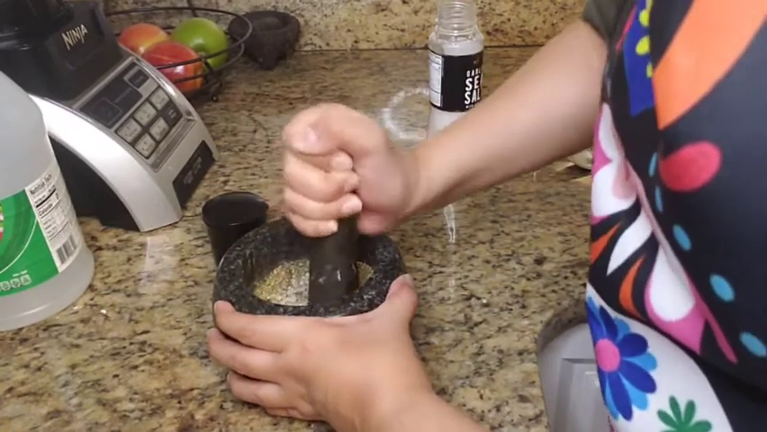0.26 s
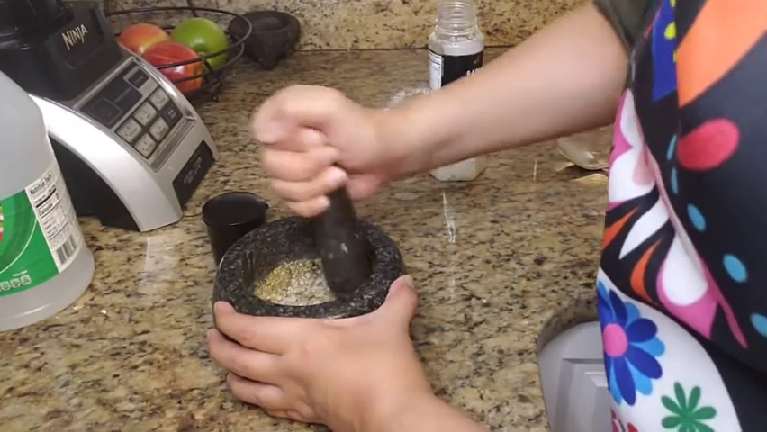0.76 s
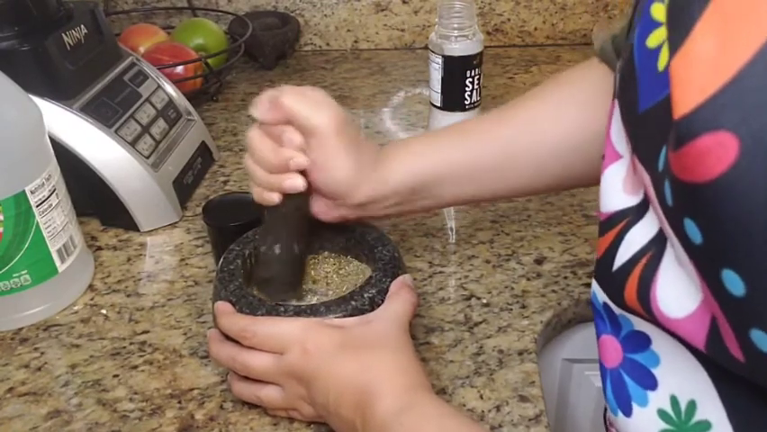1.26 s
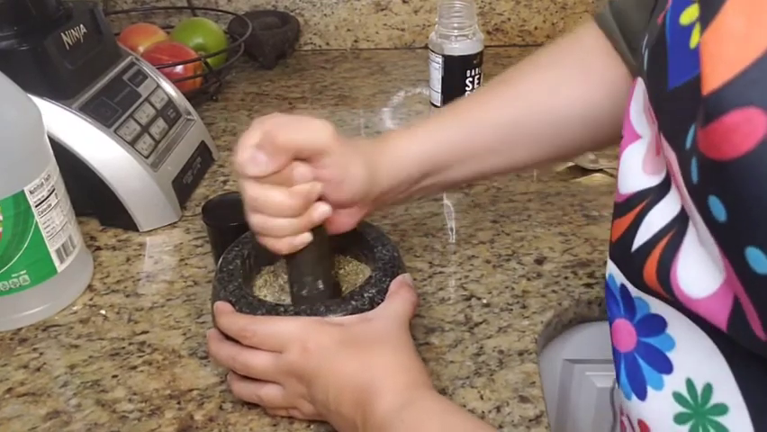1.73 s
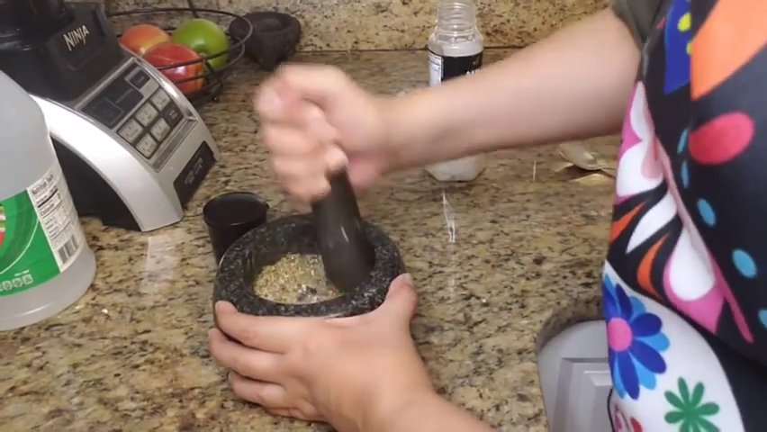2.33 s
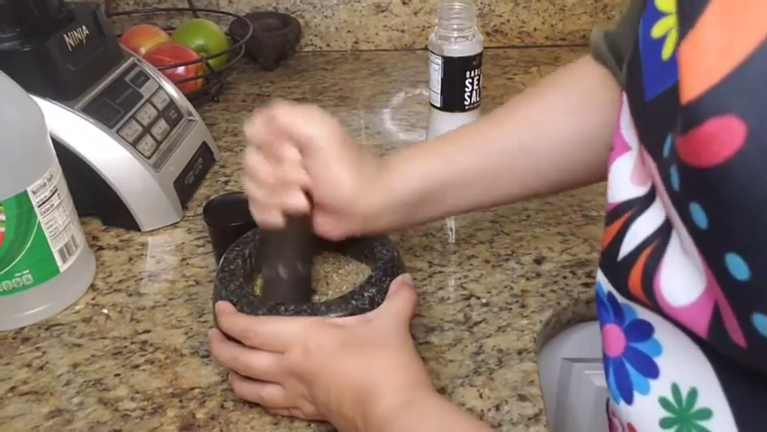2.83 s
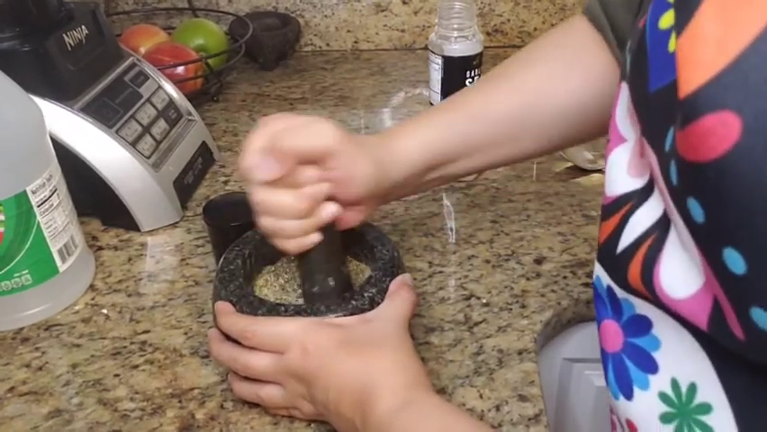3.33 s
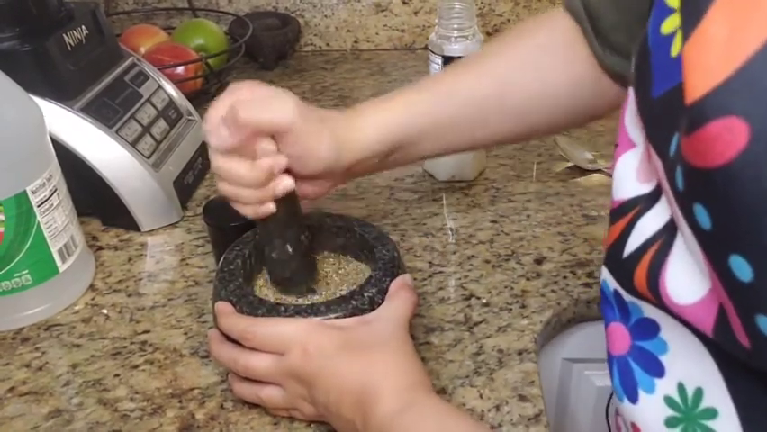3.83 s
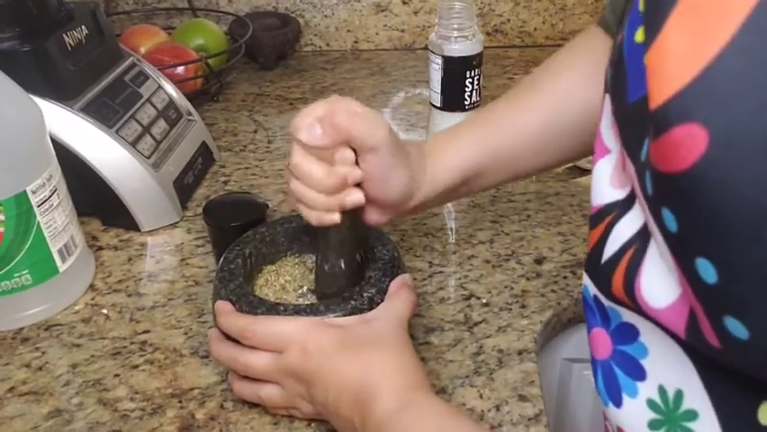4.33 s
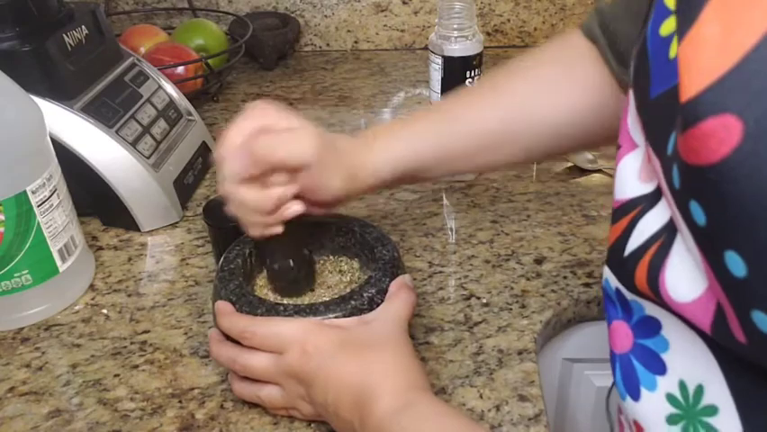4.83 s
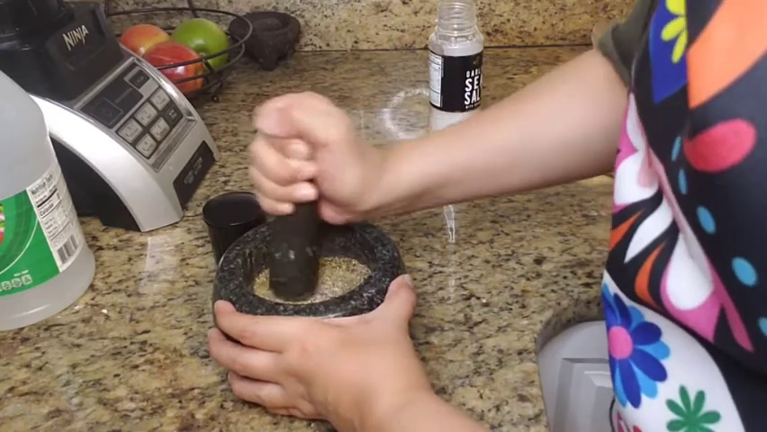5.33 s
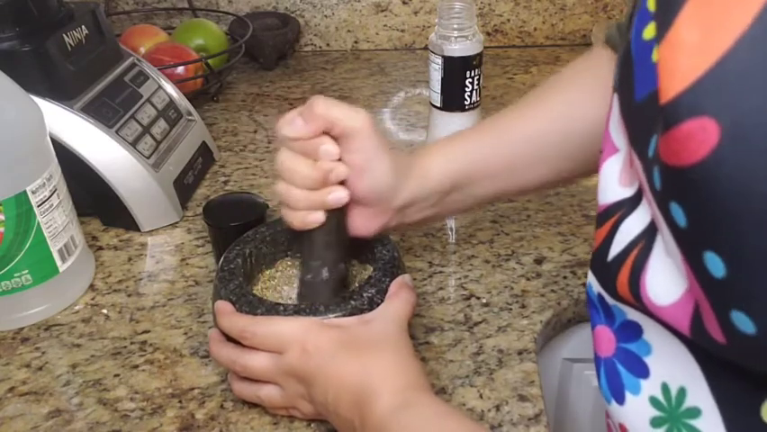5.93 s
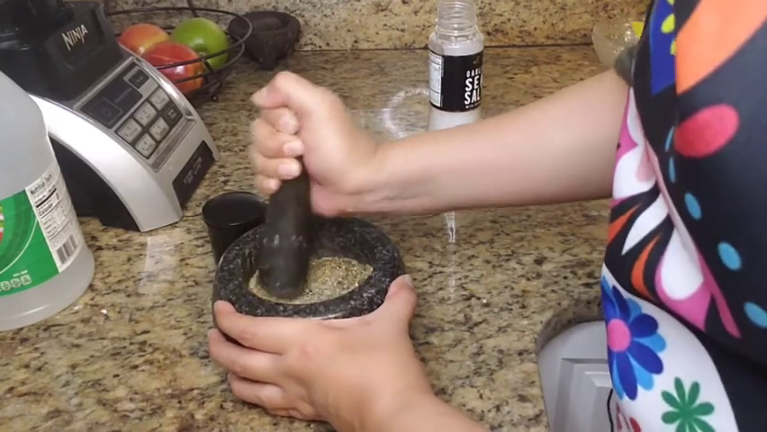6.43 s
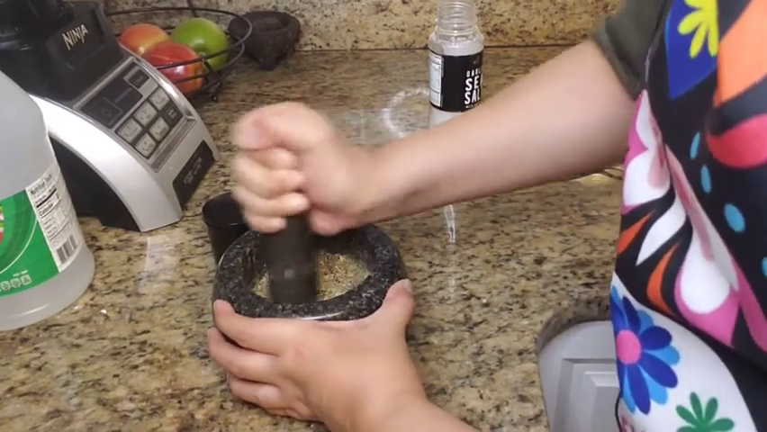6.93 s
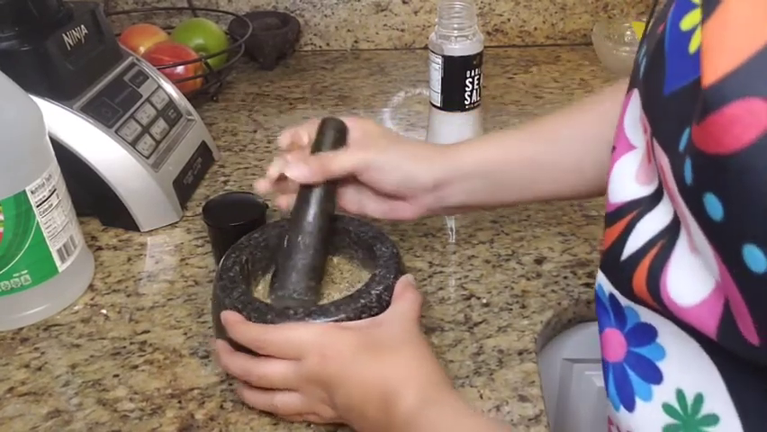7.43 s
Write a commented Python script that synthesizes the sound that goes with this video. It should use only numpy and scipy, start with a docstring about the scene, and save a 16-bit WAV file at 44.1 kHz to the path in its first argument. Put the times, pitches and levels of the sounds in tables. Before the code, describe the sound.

A stone pestle grinds coarse salt and dry spices in a stone mortar, in quick, uneven strokes. Each push gives a hollow scrape and a fine crackle of breaking grains. Now and then the pestle clacks against the wall of the bowl, and the mortar rocks on the stone counter with low thumps. The sharpest knock comes near the end. It is heard close up in a quiet kitchen with a short reverberation.

```python
"""A stone pestle grinds coarse salt and spices in a stone mortar on a stone kitchen counter.
Stick-slip friction excites the modes of the mortar, its hollow and the counter, while grains
fracture with a gritty hiss. Now and then the pestle strikes the wall of the bowl, and the bowl
rocks on its foot with a low thump. The kitchen adds a short reverberation and a quiet hush."""
import sys
import numpy as np
from scipy import signal
from scipy.fft import rfft, irfft, next_fast_len
from scipy.io import wavfile
from scipy.ndimage import uniform_filter1d

SR = 44100
rng = np.random.default_rng(int(sys.argv[2]) if len(sys.argv) > 2 else 0)


def store_wav(level_fs):
    """Save 16-bit WAV to argv[1]."""
    pcm = np.round(np.clip(np.atleast_2d(level_fs), -1, 1) * 32767)
    wavfile.write(sys.argv[1], SR, pcm.T.astype(np.int16))


N = 337806

# resonances of the pestle: pitch_hz, bandwidth_hz, level_db
PESTLE_MODES = [(5764, 64, -6), (6450, 45, -3)]
# pushes of the pestle through the spice: start_s, hold_s, grit_db, scrape_db, hollow_db
PUSHES = [(0.006, 0.079, -55.5, -45, -44), (0.123, 0.0083, -49, -48, -51.5),
          (0.243, 0.12, -56.5, -45.5, -49), (0.382, 0.058, -51.5, -38.5, -38.5),
          (0.513, 0.016, -56.5, -41.5, -37), (0.737, 0.005, -56, -57, -50.5),
          (0.843, 0.087, -52, -40.5, -45.5), (1.054, 0.017, -44, -26.5, -28.5),
          (1.149, 0.0036, -54, -42.5, -43.5), (1.259, 0.0035, -55, -56, -59),
          (1.313, 0.0062, -55.5, -46.5, -48), (1.4, 0.004, -66, -68, -95), (1.487, 0.0035, -49, -41, -32),
          (1.635, 0.004, -54.5, -44, -32.5), (1.679, 0.11, -53.5, -41.5, -42), (1.901, 0.11, -59, -45, -50),
          (1.996, 0.082, -53.5, -40, -39.5), (2.383, 0.025, -56.5, -37, -39),
          (2.456, 0.004, -52.5, -54, -49), (2.501, 0.0061, -53, -43.5, -52), (2.562, 0.066, -55, -45, -48),
          (2.725, 0.012, -50, -35.5, -37), (2.783, 0.027, -51, -38.5, -42),
          (2.985, 0.0045, -53.5, -37.5, -51), (3.083, 0.023, -45.5, -39.5, -37.5),
          (3.181, 0.073, -50, -49, -42.5), (3.221, 0.1, -53.5, -40.5, -44),
          (3.471, 0.0071, -52, -44.5, -46), (3.534, 0.011, -56, -33, -33.5),
          (3.613, 0.051, -50.5, -37.5, -37.5), (3.932, 0.027, -50.5, -52.5, -65),
          (4.021, 0.027, -46, -40, -43), (4.13, 0.068, -49, -42.5, -41), (4.248, 0.0037, -53.5, -44.5, -49),
          (4.396, 0.004, -49, -32.5, -32), (4.478, 0.0026, -53, -39, -37), (4.68, 0.0056, -62, -44, -42),
          (4.742, 0.07, -63.5, -52.5, -50.5), (4.858, 0.047, -57.5, -47.5, -49),
          (4.93, 0.077, -56.5, -43, -44), (4.993, 0.057, -48, -38.5, -46), (5.105, 0.022, -54, -43, -42),
          (5.272, 0.058, -52, -35, -36.5), (5.353, 0.03, -53, -42, -43), (5.625, 0.0045, -60.5, -44.5, -47),
          (5.706, 0.038, -52.5, -38.5, -43), (5.792, 0.004, -58, -53, -60), (5.901, 0.062, -48, -41, -42),
          (6.04, 0.0036, -47.5, -38, -38), (6.135, 0.025, -47, -42.5, -47),
          (6.213, 0.0077, -48.5, -43, -38.5), (6.407, 0.083, -55.5, -60.5, -57),
          (6.61, 0.0052, -44.5, -35, -31.5), (6.692, 0.12, -55.5, -45, -50.5),
          (6.88, 0.004, -56, -43.5, -44), (6.927, 0.0041, -53.5, -37, -36),
          (6.972, 0.0036, -53.5, -73, -72), (7.235, 0.028, -57, -34, -40), (7.357, 0.038, -66.5, -80, -71),
          (7.621, 0.025, -62.5, -42, -42)]


def from_db(db):
    """Amplitude ratio: tenfold for every 20 dB."""
    return 10 ** (np.asarray(db) / 20)


def unit_power(x):
    """Normalisation to a mean square of one."""
    return x / np.sqrt(np.mean(x ** 2) + 1e-20)


def at_hz(points, hz):
    """Interpolation of a table on a logarithmic frequency axis."""
    frequencies, values = np.transpose(points)
    return np.interp(np.log(hz + 1), np.log(frequencies + 1), values)


def colour(x, points):
    """Zero-phase filtering by a table of gain in dB against frequency."""
    size = next_fast_len(x.shape[-1])
    hz = np.fft.rfftfreq(size, 1 / SR)
    return irfft(rfft(x, size) * from_db(at_hz(points, hz)), size)[..., :x.shape[-1]]


def band_limit(x, hz, kind, order=2):
    """Filtering with a maximally flat passband."""
    return signal.sosfilt(signal.butter(order, hz, kind, fs=SR, output="sos"), x)


def drift(rate_hz):
    """Slow random modulation: low-passed noise of unit power."""
    pole = np.exp(-2 * np.pi * rate_hz / SR)
    return unit_power(signal.lfilter([1], [1, -2 * pole, pole ** 2], rng.standard_normal(N + SR))[SR:])


def grains(per_s, spread_db):
    """Shot noise: independent clicks of uneven size and sign, at unit power."""
    sizes = from_db(spread_db * np.minimum(rng.exponential(1, N), 5)) * rng.choice([-1, 1], N)
    return unit_power(sizes * (rng.random(N) < per_s / SR))


def resonate(force, modes):
    """Modal superposition: damped resonances of alternating sign, scaled to keep white noise's power."""
    out, power = 0, 0
    for k, (hz, bandwidth_hz, db) in enumerate(modes):
        radius = np.exp(-np.pi * bandwidth_hz / SR)
        b = (1 - radius ** 2) / 2 * np.array([1, 0, -1])
        a = [1, -2 * radius * np.cos(2 * np.pi * hz / SR), radius ** 2]
        out = out + (-1) ** k * from_db(db) * signal.lfilter(b, a, force + 1e-18)
        power += from_db(2 * db) * np.pi * bandwidth_hz / SR
    return out / np.sqrt(power)


def push_envelope_db(peaks_db, fade_db_per_s, rise_db_per_s=712.5):
    """Incoherent addition: each push sets in, holds and eases off, and overlapping pushes add in power."""
    t = np.arange(0, N + 64, 64) / SR
    start_s, hold_s = np.transpose(PUSHES)[:2, :, None]
    loss_db = np.maximum((start_s - t) * rise_db_per_s, (t - start_s - hold_s) * fade_db_per_s)
    power = np.sum(from_db(2 * (peaks_db[:, None] - np.maximum(0, loss_db))), axis=0)
    return np.interp(np.arange(N) / SR, t, 10 * np.log10(power + 1e-12))


def kitchen_hush():
    """Stationary background noise, mostly bass, uncorrelated between mid and side."""
    # spectral density of the background: frequency_hz, level_db
    spectrum = [(15, -54.5), (25, 13.5), (70, -9), (137, -6), (195, -6), (256, -27), (293, 2), (335, -6.5),
                (405, -15.5), (489, -14.5), (1370, -47.5), (4490, -51), (6210, -36), (8360, -54),
                (16000, -46)]
    return from_db(-50.5) * unit_power(colour(rng.standard_normal((2, N)), spectrum))


def kitchen_reverb(sound, wet_db, direct_side_db):
    """Reverberation: mid and side each get the direct sound and a diffuse, exponentially dying tail."""
    # reverberation time of the kitchen: frequency_hz, t60_s
    decay_times = [(100, 0.76), (300, 0.12), (800, 0.22), (2000, 0.42), (5000, 0.1), (13000, 0.067)]
    size = 20000
    t, tail = np.arange(size) / SR, np.zeros((2, size))
    edges_hz = 40 * 2 ** np.arange(0, 9.1, .75)
    for low, high in zip(edges_hz, edges_hz[1:]):
        band = band_limit(rng.standard_normal((2, size)), [low, high], "band")
        t60_s = at_hz(decay_times, np.sqrt(low * high))
        tail += band * from_db(-60 * t / t60_s) / np.sqrt(t60_s * SR / 14)
    tail *= (1 - np.exp(-t / 0.0016)) * from_db(wet_db)  # echoes build up
    mid, side = signal.fftconvolve(sound, tail, axes=1)[:, :N]
    # the pressure difference between two spaced points lags a quarter cycle
    quadrature = signal.hilbert(sound[1], next_fast_len(N)).imag[:N]
    return mid + sound[0], side + from_db(direct_side_db) * quadrature


def counter_rumble(hollow_peaks_db, slip):
    """Forced vibration: coarse grains drive the heavy slab, which responds only to slow forces."""
    # resonances of the counter slab: pitch_hz, bandwidth_hz, level_db
    slab_modes = [(52, 47, -6.5), (100.5, 13, -0.5), (119.3, 12.4, -3.5), (146.2, 31.4, -3),
                  (197, 17, -5.5), (225.4, 76.7, -6.5)]
    level_db = push_envelope_db(-42.5 + 0.34 * (hollow_peaks_db + 40), fade_db_per_s=156)
    force = grains(per_s=400, spread_db=-0.5) * from_db(level_db + 2 * slip)
    return resonate(band_limit(force, 400, "low"), slab_modes)


def rocking_thumps(decay_s=0.01):
    """Damped oscillation: the bowl rocks a few cycles on its foot, at a pitch set by the load on it."""
    # the mortar rocks on the counter: start_s, level_db, pitch_hz
    thumps = [(0.296, -33.5, 108.5), (0.733, -31.5, 104), (0.855, -33.5, 100.5), (0.908, -37.5, 150),
              (0.937, -32.5, 80), (1.049, -34, 191), (1.263, -36, 103), (1.315, -37, 101),
              (1.629, -37.5, 179), (1.715, -38.5, 128), (1.964, -34.5, 113), (2.375, -38, 89),
              (2.418, -36, 115), (2.468, -32, 104), (2.502, -33.5, 99), (2.569, -33, 107.5),
              (2.729, -37, 172), (3.099, -36, 97), (3.482, -29.5, 98.7), (3.923, -34, 108),
              (3.958, -34, 96), (4.047, -28, 99.7), (4.251, -37, 91), (4.387, -28, 104), (4.476, -30, 152),
              (4.68, -28, 111), (4.93, -33.5, 120), (5.116, -33, 127), (5.265, -37, 156), (5.618, -37, 169),
              (5.686, -30, 112.4), (5.74, -31, 116), (5.928, -30.5, 124), (6.039, -26, 107),
              (6.233, -39, 107), (6.396, -39, 96), (6.613, -37, 177), (6.691, -37.5, 118),
              (6.932, -36, 134), (7.169, -36.5, 103), (7.221, -33.5, 143.5), (7.571, -35, 100.5)]
    size = 8000
    out, t = np.zeros(N + size), np.arange(size) / SR
    age = t / decay_s
    for start_s, db, hz in thumps:
        ratio, offset = rng.uniform(1.74, 2.434), rng.uniform(0, 2 * np.pi)  # inharmonic overtone
        phase = 2 * np.pi * hz * t * (1 + 0.37 * np.exp(-age))  # pitch sags as the push eases
        wave = np.sin(phase) + 0.34 * np.sin(ratio * phase + offset)
        onset = round(start_s * SR)
        out[onset:onset + size] += from_db(db + 7) * np.sqrt(age) * np.exp(-age) * wave
    return out[:N]


def knock_forces(rise_s=0.00067):
    """Impact: a tick, then dying chatter; powder between the stones sets how dull or bright it is."""
    # the pestle strikes the bowl: start_s, level_db, brightness_db, crack_db, chatter_s
    knocks = [(0.043, -50.5, 13, -48, 0.03), (0.834, -66, -36, -79, 0.029), (0.957, -20, -56, -69, 0.012),
              (1.038, -38, -27, -70, 0.043), (1.08, -21, -30, -36.5, 0.0093),
              (1.476, -42, -24, -52.5, 0.032), (1.633, -46, -2, -56, 0.016),
              (1.693, -34.5, -14.5, -54, 0.099), (1.996, -28, -20, -48, 0.0056),
              (2.042, -32.5, -14, -48, 0.011), (2.356, -17, -4.5, -49, 0.019),
              (2.376, -26.5, -2, -66, 0.032), (2.564, -38.5, -13, -57, 0.013),
              (2.732, -25.5, -38, -45, 0.0028), (2.965, -17.5, -11, -89, 0.013),
              (2.983, -17, -7, -72, 0.017), (3.173, -34.5, -18, -53, 0.01), (3.263, -38.5, 1.5, -49, 0.019),
              (3.526, -18.5, -29.5, -68, 0.0064), (4.383, -24, -30, -45, 0.024),
              (4.492, -24.5, -40, -69, 0.0018), (4.68, -28.5, -39, -44, 0.0033),
              (4.936, -45, -34, -57, 0.0066), (5.022, -40, -15, -41, 0.0083), (5.258, -40, -30, -56, 0.02),
              (5.322, -30.5, -24, -55, 0.014), (5.622, -39.5, -32, -59, 0.013),
              (5.679, -37.5, -10, -53.5, 0.051), (6.034, -25, -15, -34, 0.0085),
              (6.494, -43, -12, -49, 0.023), (6.612, -30, -17, -44, 0.013), (6.704, -34.5, -7, -52, 0.019),
              (6.931, -30, -28, -55, 0.0081), (7.22, -10.5, -21, -64, 0.0049),
              (7.638, -17.5, -23.5, -69, 0.0097)]
    size = 4000
    forces, t = np.zeros((5, N + size)), np.arange(size) / SR
    for start_s, db, bright_db, crack_db, chatter_s in knocks:
        burst = rng.standard_normal(size) * (1 - np.exp(-t / rise_s)) * np.exp(-t / chatter_s)
        burst[0] += 11.9  # tick of first contact
        dull_db = -37.5 + 0.39 * (db + 30.5) - 0.2 * bright_db
        clunk_db = db - 3.5 + 0.18 * bright_db
        clack_db = db + 9.5 + bright_db
        gains = from_db([dull_db, db, clunk_db, clack_db, crack_db])
        onset = round(start_s * SR)
        forces[:, onset:onset + size] += gains[:, None] * burst
    dull, knock, clunk, clack, crack = forces[:, :N]
    on_mortar = (band_limit(knock, [830, 1250], "band")
                 - band_limit(clunk, [1250, 2700], "band")  # inverted to keep the band edges in phase
                 + band_limit(clack, [2700, 8000], "band"))
    on_pestle = from_db(-38.5) * knock + from_db(-29.5) * clack
    return band_limit(dull, 900, "low"), on_mortar, on_pestle, crack


def cracking_grit(peaks_db, slip, crack, swell_db=2.6):
    """Brittle fracture: grains click under pushes and knocks, in two partly correlated channels."""
    # spectral density of cracking grains: frequency_hz, level_db
    spectrum = [(1410, -22.5), (2400, -7), (2530, -10.5), (3240, -13), (4820, -7.5), (5210, -9),
                (5750, -2.5), (7520, -6.5), (8570, -13.5), (14300, -8.5), (15000, -2.5)]
    common, separate = grains(per_s=9000, spread_db=3.5), grains(per_s=9000, spread_db=3.5)
    big_grains = np.abs(grains(per_s=50, spread_db=3.0))
    crumble = signal.lfilter([1], [1, -1.98, .99 ** 2], big_grains)  # each lasts some milliseconds
    clicks = np.array([common, .3 * common + np.sqrt(.91) * separate])
    hiss = unit_power(colour(clicks, spectrum)) + from_db(-18) * resonate(clicks, PESTLE_MODES)
    crackle, edges_hz = 0, 1200 * 2 ** np.arange(0, 4, .34)
    for k, band_hz in enumerate(zip(edges_hz, edges_hz[1:])):
        swell = from_db(swell_db * drift(rate_hz=12.5))  # each band swells on its own
        crackle = crackle + (-1) ** k * band_limit(hiss, band_hz, "band") * swell
    level_db = push_envelope_db(peaks_db, fade_db_per_s=209.5)
    crushing = from_db(level_db + 1.5 * slip) * (.8 + .2 * unit_power(crumble))
    return crackle * (crushing + uniform_filter1d(np.abs(crack), size=30))


def grinding():
    """Stick-slip friction modulates scrape, grit and rumble together; impacts ring the same stone."""
    # resonances of the stone mortar: pitch_hz, bandwidth_hz, level_db
    mortar_modes = [(299, 14, 2), (634, 42, -3.5), (726.5, 56, -5), (845.6, 15.2, -3), (914.6, 40.3, -5),
                    (1029, 34.5, -4), (1128, 41, -18), (1347, 58, -14.5), (1416, 14, -15), (1510, 74, -15),
                    (1688, 100, -15.5), (1910, 450, -13.5), (1992, 12, -14), (2368, 48, -15.5),
                    (2185, 660, -15), (2775, 130, -20), (3180, 200, -33), (3276, 63, -24.5),
                    (3400, 480, -40.5), (4220, 300, -33.5), (5000, 120, -39)]
    # resonances of the bowl's hollow: pitch_hz, bandwidth_hz, level_db
    hollow_modes = [(405, 39.4, -1.5), (469.2, 48.5, 1), (547, 65, -5.5)]
    grit_peaks_db, scrape_peaks_db, hollow_peaks_db = np.transpose(PUSHES)[2:]
    scrape_db = push_envelope_db(scrape_peaks_db, fade_db_per_s=269)
    hollow_db = push_envelope_db(hollow_peaks_db, fade_db_per_s=269)
    slip = drift(rate_hz=32)
    on_hollow, on_mortar, on_pestle, crack = knock_forces()
    friction = grains(per_s=5000, spread_db=2.0) * from_db(2 * slip)
    scrape = band_limit(friction * from_db(scrape_db), 1500, "low", order=1)
    mortar = resonate(scrape + on_mortar, mortar_modes)
    hollow = resonate(friction * from_db(hollow_db) + on_hollow, hollow_modes)
    pestle = resonate(on_pestle, PESTLE_MODES)
    rumble = counter_rumble(hollow_peaks_db, slip)
    grit = cracking_grit(grit_peaks_db, slip, crack)
    return mortar + hollow + pestle + grit, rumble + rocking_thumps()


def scene():
    """Superposition of mortar, counter and kitchen in mid and side, turned into left and right."""
    # stereo width, as the gain of the side signal: frequency_hz, gain_db
    width = [(60, -17.5), (130, -15.5), (290, -11), (640, -4.5), (1410, 0), (3100, -0.5), (6820, 1),
             (15000, 2.5)]
    # level of left over right: frequency_hz, difference_db
    balance = [(60, -1), (180, 1), (550, 0.5), (1650, 0.5), (4970, 4.5), (15000, -3)]
    bowl, slab = grinding()
    mid, side = kitchen_reverb(bowl + from_db(1.5) * slab, wet_db=-8.5, direct_side_db=-2.0)
    hush = kitchen_hush()
    mid = mid + .5 * slab + hush[0]  # the slab's thuds arrive nearly dry
    side = colour(side + hush[1], width)
    left = colour(mid + side, [(hz, db / 2) for hz, db in balance])
    right = colour(mid - side, [(hz, -db / 2) for hz, db in balance])
    return np.array([left, right])


def record(dry):
    """Band limiting: the microphone drops the deepest bass, and the highest treble is cut steeply."""
    dry = band_limit(dry, 41, "high", order=4)
    return signal.sosfilt(signal.cheby2(14, 60, 16300, fs=SR, output="sos"), dry)


dry = scene()
out = record(dry)
store_wav(out)
```